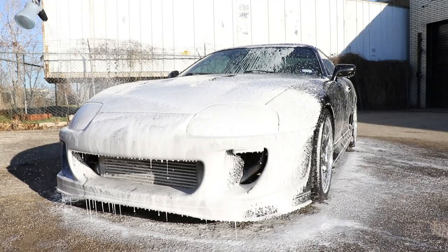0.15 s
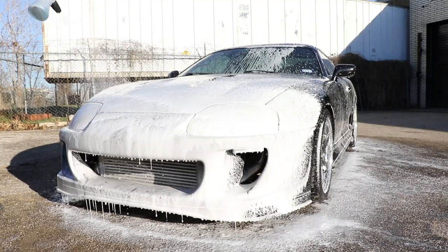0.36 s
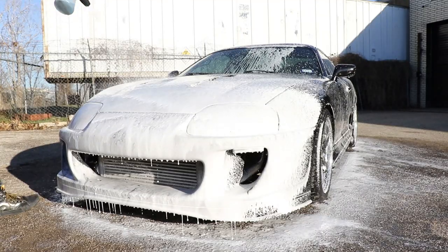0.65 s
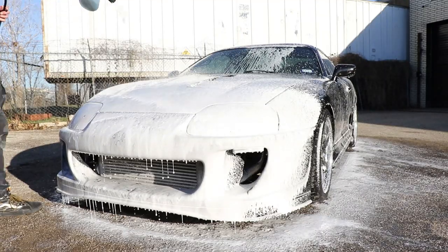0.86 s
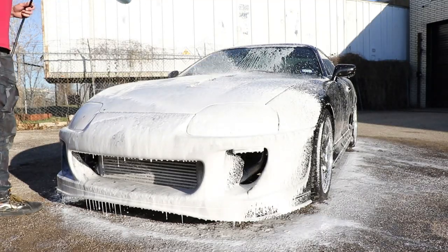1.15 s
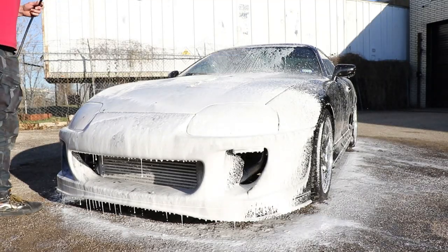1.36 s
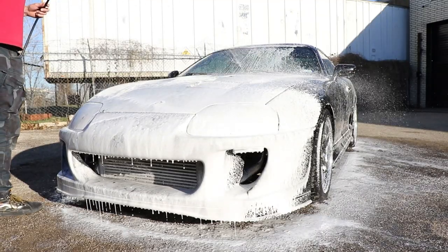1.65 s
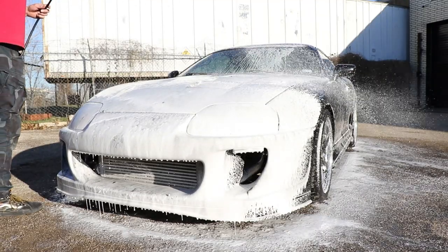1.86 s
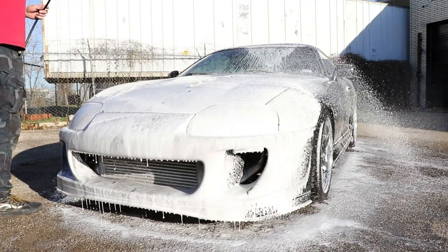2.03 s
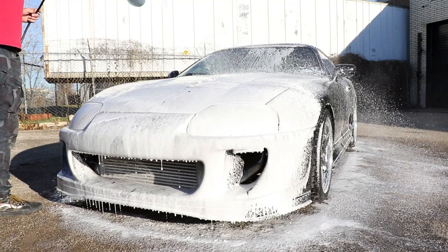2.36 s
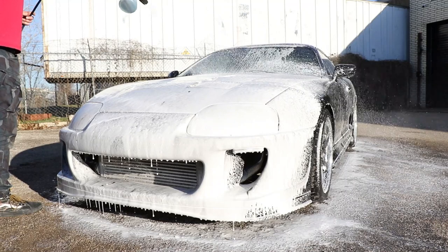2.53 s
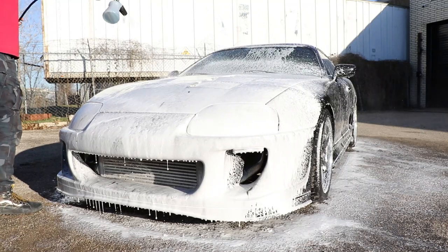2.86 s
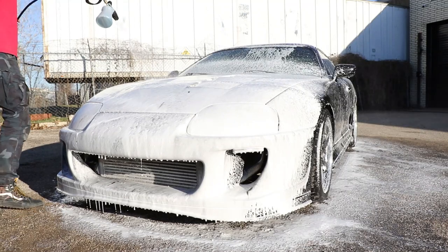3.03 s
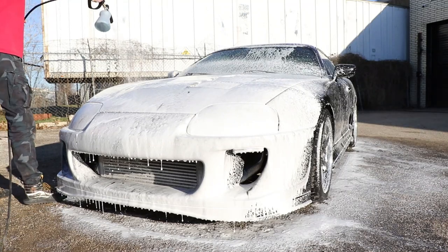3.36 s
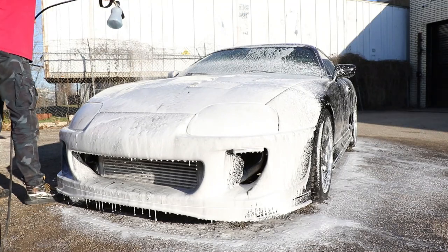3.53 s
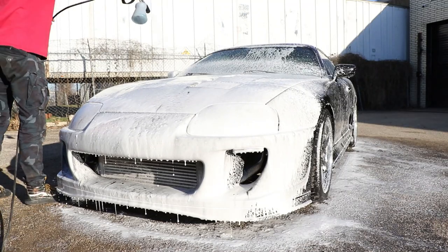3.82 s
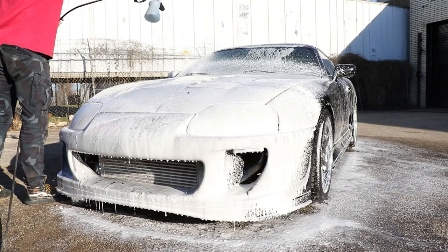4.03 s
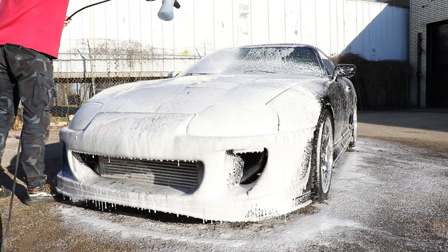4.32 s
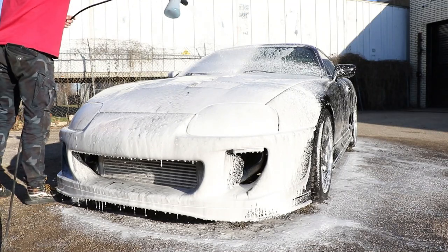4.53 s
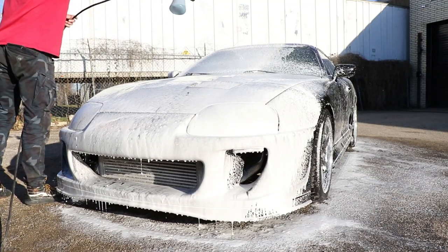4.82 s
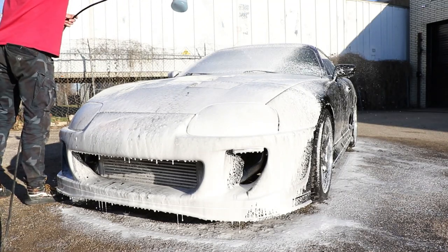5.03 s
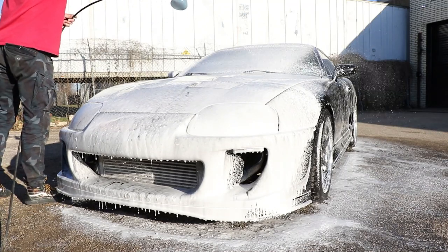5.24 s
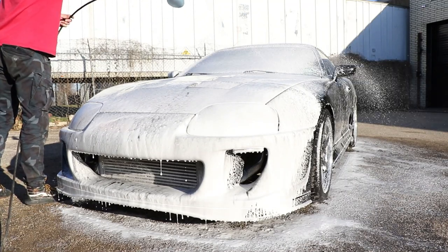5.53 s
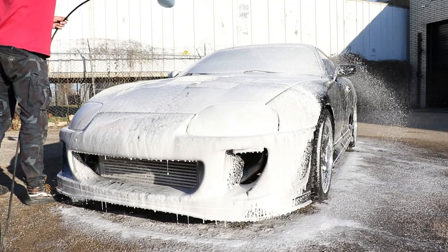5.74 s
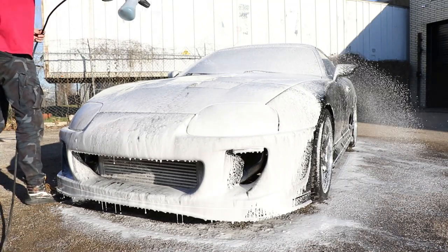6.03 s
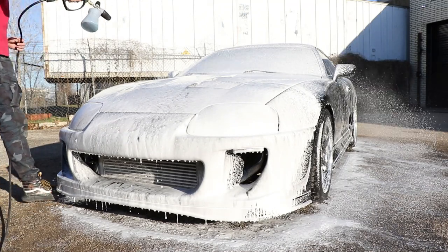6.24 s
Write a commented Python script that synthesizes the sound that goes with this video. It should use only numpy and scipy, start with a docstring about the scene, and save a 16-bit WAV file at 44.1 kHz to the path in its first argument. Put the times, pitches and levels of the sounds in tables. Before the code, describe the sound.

From 0 s, a pressure washer's foam lance is in full flow: a broad, gritty roar and bright hiss, slightly sputtering, with a breathy whistle inside. As the jet sweeps over the car, moving reflections make the hiss swish and change colour. From about 0.5 to 2 s, fine droplets crackle more strongly on the windscreen; brief, narrow squeals poke out around 2 to 2.8 s. The spray eases somewhat near 3.2 to 3.6 s, while hollow panels drum and give soft, dull booms up to 3.9 s. The steady mid-pitched pump whine and its shrill overtone stand out most around 3.5 to 4 s. Crisp spatter returns from 4.1 to 5 s, then the jet surges near 5.2 s with short whistling squeals to 5.8 s. Hiss, settling mist and whine continue to the cut at 6.4 s. Open paved yard, one fixed microphone, centred sound.

```python
"""A broad roar and hiss opens the scene: a foam lance on a pressure washer sweeps over a car in a paved yard.
The jet is coloured noise; moving echoes off ground and car body comb-filter it, so the hiss swishes. Filtered
noise also rings: a breathy band near 1.9 kHz glides as moving echoes reinforce the jet's hiss, and a steady
noise wash is the settling mist. Random impulses spatter on the panels over drumming noise, while sine tones
make the pump's whine. Booms from hollow panels come later; one fixed microphone hears it all."""
import sys
import numpy as np
from scipy import signal
from scipy.fft import rfft, irfft, next_fast_len
from scipy.io import wavfile
from scipy.ndimage import map_coordinates

SR = 44100
rng = np.random.default_rng(int(sys.argv[2]) if len(sys.argv) > 2 else 0)


def master(y):
    """Save y as 16-bit WAV."""
    cut = np.clip(np.atleast_2d(y).T, -1, 1)
    pcm = np.round(cut * 32767)  # scale
    wavfile.write(sys.argv[1], SR, pcm.astype(np.int16))


N = 281799
TIME = np.arange(N) / SR  # s
FREQS = np.maximum(np.fft.rfftfreq(2 * next_fast_len(N // 2 + 1), 1 / SR), 1)  # Hz, kept above zero


def from_db(db):
    """Logarithmic level: decibels become an amplitude gain."""
    return 10 ** (np.asarray(db) / 20)


def rms_one(x):
    """Power normalisation: scale to a root mean square of one."""
    return x / np.sqrt(np.mean(x ** 2) + 1e-20)


def in_time(rows):
    """Linear interpolation: every column after the first, at each sample time."""
    start_s, *columns = np.transpose(rows)
    return [np.interp(TIME, start_s, column) for column in columns]


def colour(points):
    """Spectral envelope: gain interpolated in dB over log frequency, with skirts falling past both ends."""
    hz, db = np.transpose(points)
    skirts = np.minimum(FREQS / hz[0], 1) * np.minimum(hz[-1] / FREQS, 1)
    return from_db(np.interp(np.log(FREQS), np.log(hz), db)) * skirts ** 2


def bell(distance):
    """Gaussian curve: one at the centre, falling with distance in standard deviations."""
    return np.exp(-.5 * distance ** 2)


def below(hz, order=12):
    """Low-pass response: a smooth gain that reaches one half at the given frequency."""
    return 1 / (1 + (FREQS / hz) ** order)


def shaped(x, gain):
    """Linear filtering: multiply the spectrum by a gain per frequency."""
    spectrum = rfft(x, 2 * len(FREQS) - 2)
    return irfft(spectrum * gain)[:N]


def noise(gain):
    """Random noise: a white spectrum takes the given colour at unit power."""
    return rms_one(shaped(rng.standard_normal(N), gain))


def drift(rate):
    """Slow random modulation: low-passed noise of spread 1, up to about rate swings a second."""
    return noise(below(rate, order=2))


def delayed(x, ms):
    """Propagation delay: x arrives late by a time that may change."""
    return map_coordinates(x, [np.arange(N) - ms * SR / 1000], order=3, mode="nearest")


# echo paths as the wand swings out and back twice: start_s [s], ground_delay_ms [ms], body_delay_ms [ms]
ECHO_PATHS = [(0.0, 1.882, 0.908), (0.2, 1.907, 0.942), (1.25, 2.356, 1.157), (1.95, 2.542, 1.2),
              (2.1, 2.487, 1.22), (2.55, 2.143, 0.797), (3.0, 1.915, 0.559), (3.35, 1.81, 0.441),
              (3.9, 1.979, 0.532), (4.7, 2.124, 0.599), (5.3, 2.209, 0.755), (5.55, 2.289, 0.854),
              (5.85, 2.285, 0.882), (6.39, 1.847, 0.6)]
# how squarely the jet's sound meets the reflecting surfaces: start_s [s], echo_strength [0-1]
FACING_STRENGTH = [(0.0, 0.4), (0.4, .8), (1.3, 0.5), (1.95, 0.78), (2.7, 0.85), (3.05, 0.42), (3.45, 0.24),
                   (3.95, 0.56), (4.55, 0.42), (5.2, 0.85), (5.7, 0.68), (6.39, 0.5)]


def echoed(x, echo_cut_hz=9000, body_share=0.61):
    """Comb filtering: two moving reflections interfere with the direct sound, sharing one power."""
    ground_ms, body_ms = in_time(ECHO_PATHS)
    ground, = in_time(FACING_STRENGTH)
    body = body_share * ground  # the car's echo against the ground's
    mirrored = shaped(x, below(echo_cut_hz, order=5))  # rough surfaces mirror little treble
    heard = x + ground * delayed(mirrored, ground_ms) + body * delayed(mirrored, body_ms)
    return heard / np.sqrt(1 + ground ** 2 + body ** 2)


# relative spectrum of the jet's turbulence: frequency_hz [Hz], density_db [dB per Hz]
JET_SPECTRUM = [(400, -6.5), (560, 1), (700, -6), (1000, -0.5), (1300, 1.5), (1650, -3.5), (2400, -8),
                (4500, 2), (5400, 4.5), (6400, 3), (7200, -2), (8000, -10.5), (11500, -22), (15500, -52)]
# lance resonances and dips on that spectrum: centre_hz [Hz], half_width_hz [Hz], gain_db [dB]
LANCE_RESONANCES = [(1950, 140, 6.5), (3680, 350, 5.5), (5520, 100, 2.5), (5800, 80, -3.5),
                    (6900, 180, -2.5)]


def jet(sputter_db=1.16, sputter_rate=120, surge_db=1.0, surge_rate=9, facing_db=3.5,
        roar_db=-26.5, hiss_db=-26.5, edge_db=-27.5, scatter=0.32):
    """Turbulent jet noise: resonances colour it, reflections comb it, and three bands surge apart."""
    lance_db = sum(db * bell((FREQS - hz) / width) for hz, width, db in LANCE_RESONANCES)
    lance = colour(JET_SPECTRUM) * from_db(lance_db)
    # sound scattered round the yard fills the notches of the echoes
    heard = echoed(noise(lance)) + scatter * noise(lance)
    low, high = below(2400), below(4600)
    zones = [(low, roar_db), (high - low, hiss_db), (1 - high, edge_db)]
    out = 0
    for zone, db in zones:
        surging_db = db + surge_db * drift(surge_rate)
        out = out + rms_one(shaped(heard, zone)) * from_db(surging_db)
    facing, = in_time(FACING_STRENGTH)
    clots_db = sputter_db * drift(sputter_rate)  # air and soap leave the nozzle in clots
    return out * from_db(clots_db + facing_db * (facing - facing.mean()))


def ringing(hz, width_hz):
    """Narrow-band resonance: two slow noises modulate a carrier, in quadrature, whose centre may glide."""
    phase = 2 * np.pi * np.cumsum(hz * np.ones(N)) / SR
    band = below(width_hz, order=3)
    return noise(band) * np.cos(phase) + noise(band) * np.sin(phase)


# a breathy band near 1.9 kHz that glides as moving echoes reinforce the jet's hiss, before flutter: start_s
# [s], pitch_hz [Hz], level_db [dB]
BREATHY_BAND = [(0.0, 2020, -26.5), (0.7, 1893, -27.5), (1.4, 1788, -25.5), (1.6, 1818, -33),
                (1.85, 1973, -27.5), (2.5, 1860, -31.5), (2.8, 1997, -31), (3.35, 1806, -31.5),
                (3.7, 1994, -28), (4.15, 1997, -26.5), (4.4, 1944, -33), (5.4, 1840, -30.5),
                (5.95, 1868, -30), (6.39, 1980, -32)]
# higher lance resonances that ring in place, before flutter: pitch_hz [Hz], half_width_hz [Hz], level_db [dB]
FIXED_RINGS = [(3694, 260, -31), (5535, 50, -47), (6250, 220, -36.5)]
# squeals as the jet locks on to a resonance:
# start_s [s], length_s [s], start_pitch_hz [Hz], end_pitch_hz [Hz], level_db [dB at the swell's peak]
BRIEF_SQUEALS = [(0.0, 0.23, 5330, 5300, -29), (0.9, 0.4, 6350, 6050, -31), (2.0, 0.4, 6030, 6200, -30),
                 (2.417, 0.3, 3510, 3810, -27), (2.58, 0.26, 3850, 4430, -29), (3.1, 0.25, 3610, 3780, -31),
                 (5.15, 0.27, 3590, 3660, -28), (5.43, 0.17, 3590, 3440, -30),
                 (5.494, 0.37, 5580, 5600, -29), (5.551, 0.24, 6530, 6580, -29)]


def whistles(low_width_hz=95, squeal_width_hz=45, flutter_db=1.0, flutter_rate=8):
    """Flow-excited resonance: a breathy low band throughout, higher rings through moving echoes, brief squeals."""
    hz, db = in_time(BREATHY_BAND)
    out = from_db(db + flutter_db * drift(flutter_rate)) * ringing(hz, low_width_hz)
    rings = 0
    for hz, width, db in FIXED_RINGS:
        rings = rings + from_db(db + flutter_db * drift(flutter_rate)) * ringing(hz, width)
    out += echoed(rings)
    for start_s, length_s, start_hz, end_hz, db in BRIEF_SQUEALS:
        along = np.clip((TIME - start_s) / length_s, 0, 1)
        swell = from_db(db) * np.sin(np.pi * along)
        out += swell * ringing(start_hz + (end_hz - start_hz) * along, squeal_width_hz)
    return out


# relative spectrum of the mist settling over the yard: frequency_hz [Hz], density_db [dB per Hz]
WASH_SPECTRUM = [(500, -7.5), (900, -7.5), (1500, 0), (2500, -3), (3000, 0.5), (4500, 1.5), (7000, -8.5),
                 (9000, -19)]


def wash(level_db=-32):
    """Diffuse field: mist settling all round gives steady noise, free of moving echoes."""
    return from_db(level_db) * noise(colour(WASH_SPECTRUM))


# relative spectrum of droplet impacts: frequency_hz [Hz], density_db [dB per Hz]
DROPLET_SPECTRUM = [(2000, -25), (5000, 6), (7500, 7), (10300, 9.5), (12800, 2), (14200, -4.5),
                    (15700, -11)]


def spatter(drops_per_s=7500, size_db=3.0, mist=0.97, clump_db=1.15, level_db=0.84):
    """Random impulses: droplets of uneven strength tick on paint and glass over a fine mist of noise."""
    tone, split = colour(DROPLET_SPECTRUM), below(13200)
    ticking = 0
    for band in (split, 1 - split):  # each band has its own drops, at the full rate
        strength = from_db(size_db * np.minimum(rng.exponential(1, N), 6.5))
        impulses = strength * rng.choice([-1, 1], N) * (rng.random(N) < drops_per_s / SR)
        ticking = ticking + shaped(impulses, tone * np.sqrt(band))
    spray = rms_one(ticking) + mist * noise(tone)
    clumped = spray * from_db(clump_db * drift(60))
    return rms_one(clumped) * from_db(level_db)


# relative spectrum of the panels under the foam: frequency_hz [Hz], density_db [dB per Hz]
DRUM_SPECTRUM = [(200, -31), (300, -20.5), (380, -12), (450, -2), (500, 0.5), (550, -10), (620, -15),
                 (800, -12)]
# relative spectrum of the rumble below the drumming: frequency_hz [Hz], density_db [dB per Hz]
RUMBLE_SPECTRUM = [(20, -14), (42, -14), (70, -9), (110, -4), (160, -12), (220, -1), (300, 4), (450, -30)]
# gain on the spatter, high while the stream crosses the windscreen: start_s [s], gain_db [dB]
SPATTER_GAIN = [(0.0, -36.5), (0.2, -45), (0.43, -40), (0.51, -32), (1.05, -30), (1.45, -32.5), (1.68, -30),
                (2.0, -37.3), (2.7, -34.5), (2.9, -39.5), (3.15, -36.5), (3.3, -41.5), (3.8, -39),
                (4.08, -31), (4.45, -30.5), (5.0, -35.8), (5.75, -40), (6.39, -38.5)]
# gain on drum and rumble, highest over the hollow bonnet: start_s [s], gain_db [dB]
DRUMMING_GAIN = [(0.0, -37), (1.0, -29.5), (1.4, -34), (2.0, -33.5), (2.6, -28.5), (3.05, -30.5),
                 (3.55, -27), (4.3, -31), (6.39, -29.5)]
# dull booms where the stream crosses a hollow panel:
# centre_s [s], half_length_s [s], pitch_hz [Hz], level_db [dB at the peak]
PANEL_BOOMS = [(3.16, 0.056, 320, -42), (3.36, 0.061, 310, -35.5), (3.44, 0.19, 720, -34),
               (3.9, 0.11, 960, -26)]


def panels(drum_db=0.0, rumble_db=-25.5, glance=.22, glance_ms=1.0, wander_ms=0.055):
    """Forced vibration: the foam stream drums on sheet metal, makes it boom and bursts into droplets."""
    drum = from_db(drum_db) * noise(colour(DRUM_SPECTRUM))
    rumble = from_db(rumble_db) * noise(colour(RUMBLE_SPECTRUM))
    drumming = from_db(in_time(DRUMMING_GAIN)[0]) * (drum + rumble)
    booms = sum(boom(*row) for row in PANEL_BOOMS)
    drops = from_db(in_time(SPATTER_GAIN)[0]) * spatter()
    # ticks glance off the paint as the landing spot wanders
    glancing = glance * delayed(drops, glance_ms + wander_ms * drift(1.4))
    return drumming + booms + drops + glancing


# the pump's speed, as the pitch of its main whine: start_s [s], pitch_hz [Hz]
WHINE_PITCH = [(0.0, 572.5), (0.5, 573.7), (1.4, 571.5), (2.7, 571.5), (3.6, 570.5), (6.39, 571.1)]
# how strongly the pump carries to the microphone, before waver:
# start_s [s], whine_level_db [dB], shrill_level_db [dB]
WHINE_LEVEL = [(0.0, -32, -40), (0.3, -28, -36), (0.85, -33.5, -39.5), (2.0, -29.5, -40),
               (3.35, -28.5, -45), (3.5, -25, -32), (3.67, -23, -29), (3.77, -24.5, -40), (4.0, -26, -31),
               (4.5, -30.5, -35.5), (5.1, -28, -33.5), (6.39, -29, -32.5)]
# weaker tones of motor and pump, before fading: pitch_hz [Hz], early_level_db [dB], late_level_db [dB]
MACHINE_TONES = [(663, -46, -49), (759, -44, -51), (857, -45, -43), (884, -48, -47), (925, -49, -44),
                 (948, -44, -39), (2001, -43, -43), (3017, -52, -47), (4087, -48, -41), (4288, -48, -47),
                 (5724, -49, -48), (6545, -52, -50)]


def pump(waver_db=1.42, fade_db=4.5, wobble=0.73, shrill_multiple=5.5):
    """Periodic excitation: rotation gives a whine and locked overtone, among weaker tones that fade in and out."""
    hz, = in_time(WHINE_PITCH)
    whine_db, shrill_db = in_time(WHINE_LEVEL)
    phase = 2 * np.pi * np.cumsum(hz) / SR
    out = from_db(whine_db + waver_db * drift(17)) * np.cos(phase)
    out += from_db(shrill_db + waver_db * drift(9.1)) * np.cos(shrill_multiple * phase)
    for tone_hz, early_db, late_db in MACHINE_TONES:
        level_db = np.interp(TIME, [0.3, 3.6], [early_db, late_db]) + fade_db * drift(11.0)
        stray = wobble * np.sqrt(tone_hz / hz) * drift(4.9)  # higher tones stray further in phase
        out += from_db(level_db) * np.cos(2 * np.pi * tone_hz * TIME + stray)
    return np.sqrt(2) * out  # levels count as RMS


def boom(centre_s, half_length_s, hz, db, octaves=0.57):
    """Broad resonance: a hollow panel swells and fades as the stream passes over it."""
    band = bell(np.log2(FREQS / hz) / octaves)
    swell = bell((TIME - centre_s) / half_length_s)
    return from_db(db) * swell * noise(band)


def scene():
    """Superposition: all sources add at one microphone, which feeds both channels."""
    mono = jet() + whistles() + wash() + panels() + pump()
    return np.tile(mono, (2, 1))


def record(dry, cutoff_hz=15750):
    """Band limiting: a steep elliptic low-pass cuts the top."""
    return signal.sosfilt(signal.ellip(12, .1, 80, cutoff_hz, fs=SR, output="sos"), dry)


dry = scene()
out = record(dry)
master(out)
```